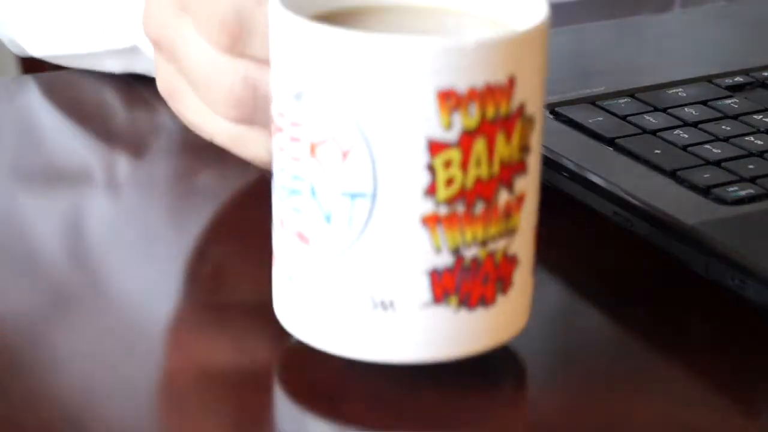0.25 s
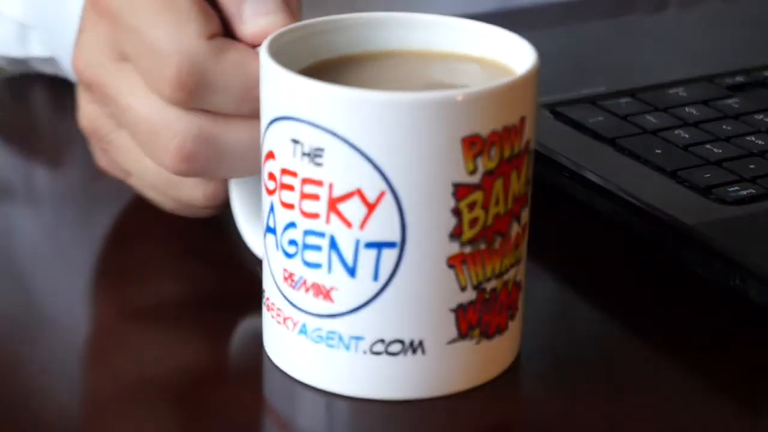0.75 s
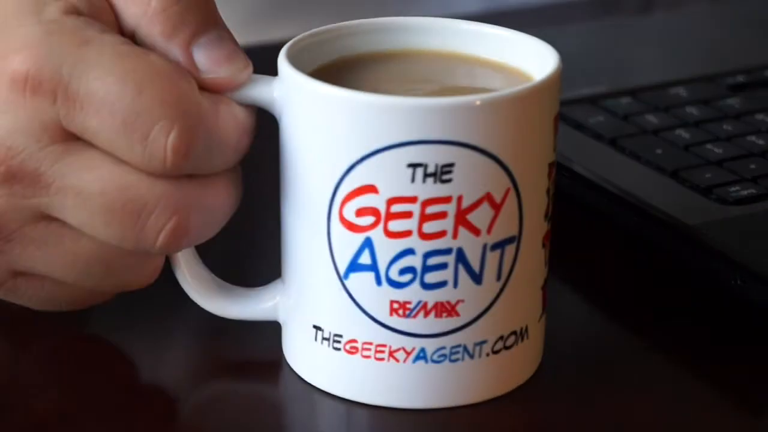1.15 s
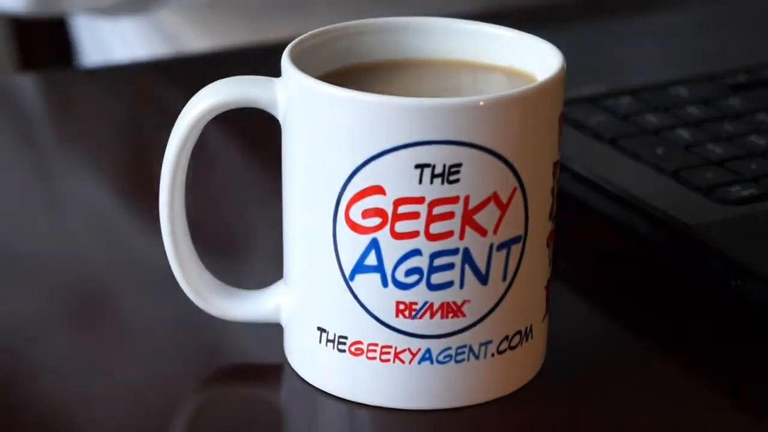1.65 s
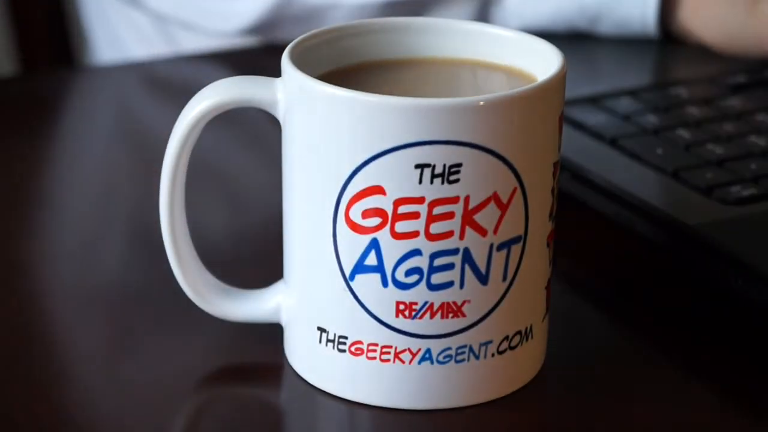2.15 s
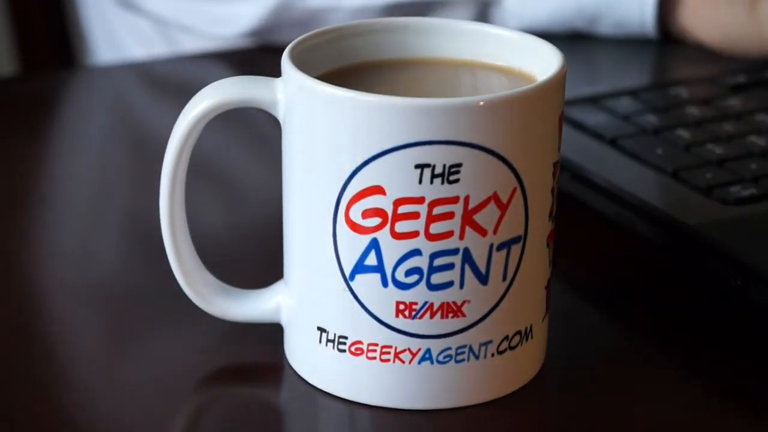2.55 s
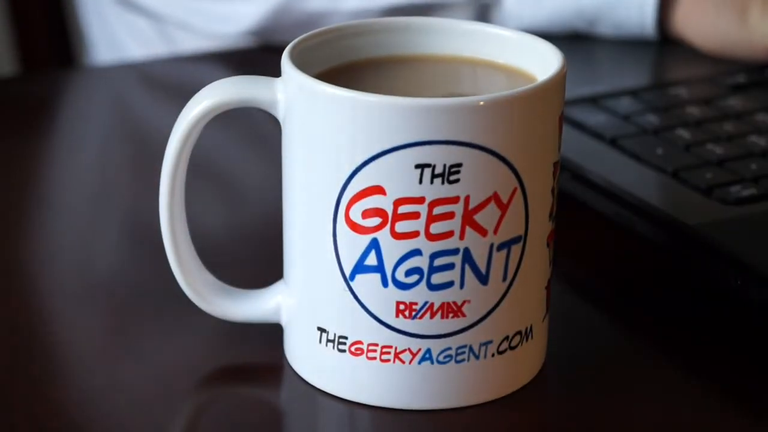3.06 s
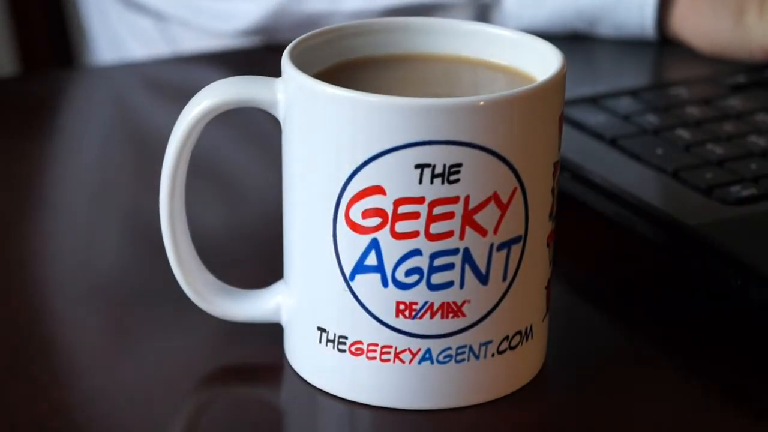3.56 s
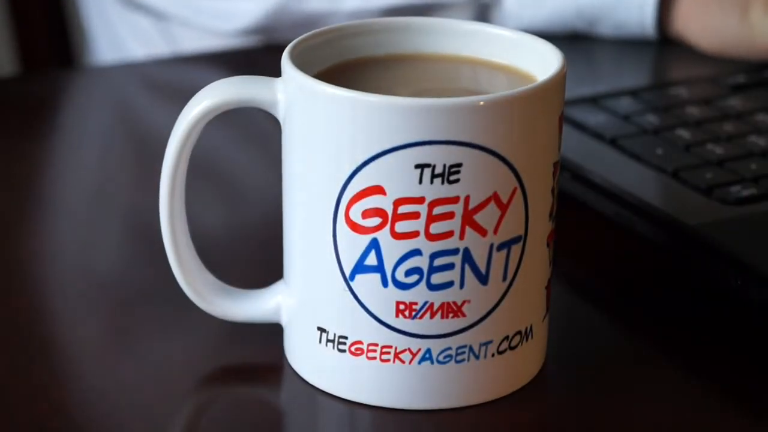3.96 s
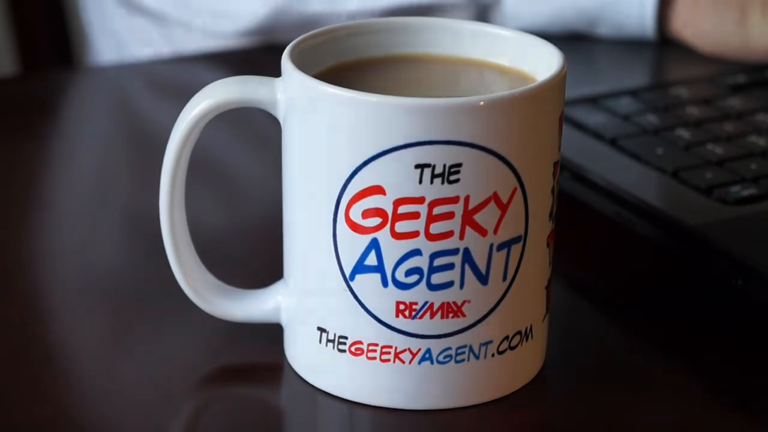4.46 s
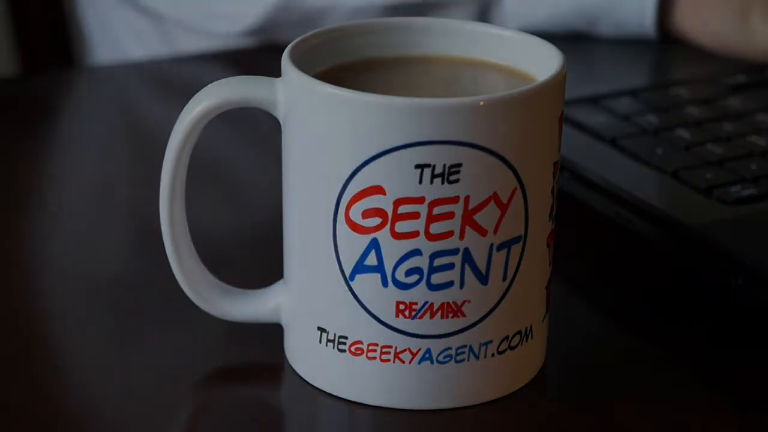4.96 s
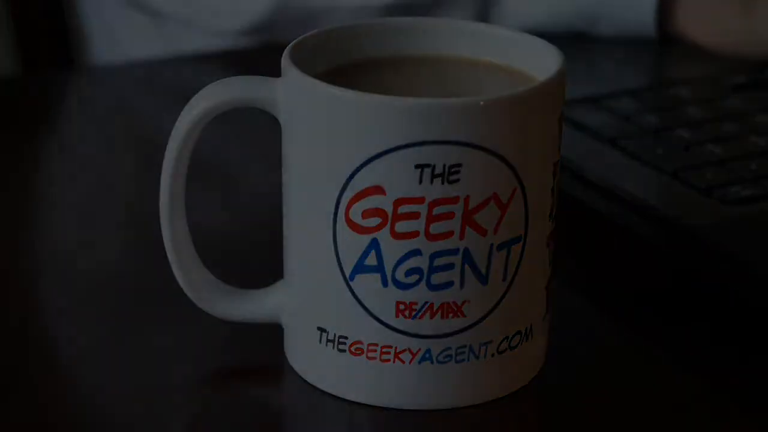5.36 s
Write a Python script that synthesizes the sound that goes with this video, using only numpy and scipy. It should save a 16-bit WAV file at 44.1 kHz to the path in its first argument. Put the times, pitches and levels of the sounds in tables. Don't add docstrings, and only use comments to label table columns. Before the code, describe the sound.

A quiet, bare office: low fan rush and a faint, very high electronic whine throughout. Tiny handle ticks come at about 0.15 s. At 0.41 s a heavy full mug strikes a wooden desk, two contacts only milliseconds apart, heard as one hard, loud, woody knock; the desk rings briefly, the room answers and the camera's automatic level ducks, then recovers. From about 0.7 to 1.5 s the mug's foot rubs round in a low, gritty stick-slip drag with a thin scrape, dotted by bright ceramic ticks, the sharpest near 1.33 s. A fainter rub, a tiny creak and a soft sleeve rustle fill 1.5 to 2.2 s. Laptop typing starts sparsely around 2.2 s and becomes quick and uneven from 2.9 to 5.4 s: crisp ticks, loose keycap rattle, occasional metallic jingle of wide keys, and soft dull thuds through the desk. It stays close, dry and much quieter than the knock.

```python
import sys
import numpy as np
from scipy import signal
from scipy.fft import rfft, irfft, next_fast_len
from scipy.io import wavfile
from scipy.ndimage import uniform_filter1d, minimum_filter1d

SR = 44100
rng = np.random.default_rng(int(sys.argv[2]) if len(sys.argv) > 2 else 0)


def materialize(psi):
    bounded = np.clip(np.atleast_2d(psi).T, -1, 1)
    quanta = np.round(bounded * 32767).astype(np.int16)
    wavfile.write(sys.argv[1], SR, quanta)


def undo_db(level):
    steps = np.asarray(level, float) / 20
    return 10 ** steps


N = 247401

# start in seconds, level in dB.
MUG_CONTACTS = [
    (.4086, 2.5),
    (.4128, 3.5),
]
# frequency in Hz, level in dB, t60 in seconds.
DESK_MODES = [(62, -21, 0.75), (125.8, -8.5, 0.64), (228, -0.5, 0.39), (330.8, 7.5, 0.29),
              (545, 10.5, 0.24), (778.3, 4.5, 0.32), (484.5, 11.5, 0.16), (703, -1.5, 0.47),
              (1204, 6.5, 0.094), (1606, -6.5, 0.46)]
# frequency in Hz, density in dB per Hz.
BLOW_COLOUR = [(25, -93), (60, -25), (120, -9.5), (350, -3), (700, -2.5), (1500, -4), (2500, -16.5),
               (3600, -22.5), (4600, -28), (8000, -33), (11000, -54), (15000, -88)]
# time in seconds, effort in dB.
DRAG_EFFORT = [(.68, -35.5), (.8, -44.5), (.9, -33.5), (1.02, -34), (1.15, -38), (1.3, -37), (1.44, -40),
               (1.55, -61), (1.66, -57)]
# frequency in Hz, density in dB per Hz.
RUB_COLOUR = [(47, -57), (80, -31), (190, -17), (354, -2.5), (437, -15.5), (549, -5.5), (679, -15.5),
              (948, -12), (3000, -28.5), (3900, -69), (6600, -120)]
# frequency in Hz, density in dB per Hz.
SCRAPE_COLOUR = [(1500, -28), (2800, 6), (5000, 11), (8000, 10), (11000, -37), (15000, -35)]
# frequency in Hz, width in Hz, level in dB.
SHELL_MODES = [(480, 97, 29), (858, 29, 33), (1014, 90, 28), (2120, 220, 4), (2630, 33, -20)]
# frequency in Hz, width in Hz, level in dB.
THUD_MODES = [(64, 15, -8.5), (112.2, 15.3, 1.5), (139, 33, -3.5), (241.6, 5.6, -7)]
# frequency in Hz, density in dB per Hz.
KEYCAP_COLOUR = [(880, -32), (1500, 1), (2120, -4), (2940, -3.5), (3280, -6.5), (3620, -5.5), (4920, -8),
                 (7610, -4), (10100, -8.5), (16000, -27.5)]
# frequency in Hz, density in dB per Hz.
AIR_COLOUR = [(12, -35), (20, -0.5), (74, -6), (193, -3.5), (357, -5), (434, -9), (800, -16.5), (1370, -20),
              (2200, -25.5), (4500, -28), (7700, -27), (11800, -33.5), (14000, -27.5), (15800, -43)]
# frequency in Hz, width in Hz, rms level in dB.
WHINE_BANDS = [(7870, 60, -72), (12500, 150, -73), (13200, 170, -62.5)]
# frequency in Hz, t60 in seconds.
ROOM_T60 = [(100, 0.48), (500, 0.57), (2000, 0.62), (5000, 0.48), (9000, 0.39), (14000, 0.36)]
# frequency in Hz, side minus mid in dB.
SIDE_LEVEL = [(60, -26), (110, -21), (200, -16.5), (380, -12.5), (700, -6.5), (1290, -6.5), (2380, -6.5),
              (4400, -13), (8120, -15), (15000, -19.5)]
# start in seconds, desk thud in dB, shell knock in dB re thud, knock pitch in Hz.
STROKES = [(1, -39.5, -1, 264), (1.329, -37, -2, 315), (1.429, -40, -4, 307), (1.729, -52, 6.5, 834),
           (2.352, -42, 8, 268), (2.371, -49, 5.5, 447), (2.449, -33, -2.5, 390), (2.665, -54, 1, 308),
           (2.896, -41, 0, 260), (2.958, -31, -5.5, 914), (3.066, -30.5, -16, 318),
           (3.122, -29, -16.5, 580), (3.219, -30.5, -15, 585), (3.319, -35, -7.5, 495),
           (3.467, -38, -1, 273), (3.679, -33, -4, 282), (3.705, -46.5, 1.5, 847),
           (3.909, -31.5, -0.5, 636), (4.023, -42.5, 1.5, 1125), (4.049, -43, 9, 267),
           (4.201, -31, -4, 300), (4.215, -41.5, 2.5, 445), (4.369, -32.5, -10, 514), (4.588, -30, -8, 547),
           (4.703, -32, -2, 497), (4.798, -28, -11, 570), (4.889, -33.5, -6.5, 486), (4.965, -33, -9, 290),
           (5.259, -30.5, -20, 397), (5.349, -36, -2, 302)]
# start in seconds, peak in dB, pitch in Hz.
SNAPS = [(0.1395, -31, 7500), (0.151, -29, 7800), (0.8914, -24.5, 5620), (0.9961, -16, 5700),
         (1.0061, -12, 8400), (1.1042, -21, 6800), (1.3256, -2.5, 7650), (1.335, -11.5, 6660),
         (1.3378, -15, 8300), (2.1886, -24, 5800), (2.2578, -13, 5870), (2.3674, -12, 7650),
         (2.372, -12, 8140), (2.6764, -11, 7350), (3.125, -21, 8700), (3.349, -20, 7600),
         (3.6904, -15, 9000), (3.8981, -20, 8100), (4.021, -20, 8500), (4.0273, -17, 7140),
         (4.205, -20, 6000), (4.3755, -33, 8150), (4.7135, -15, 8050), (4.7945, -15, 7800),
         (4.8047, -15, 8000)]
# start in seconds, level in dB, pitch in Hz, length in seconds.
SQUEAKS = [
    (1.603, -56, 6280, 0.028),
    (1.704, -50, 825, 0.042),
]
# start in seconds, level in dB, dull clack in dB, pitch in Hz.
HANDLE_TAPS = [(0.1393, -30, -9.5, 7360), (0.15, -32, -23, 8000), (0.497, -12.5, -3, 7600),
               (0.836, -28.5, -3.5, 6200), (0.8914, -37.5, 3.5, 5620), (0.9144, -17.5, -13, 4680),
               (0.95, -33, -12, 4770), (0.9951, -19, -4, 5930), (1.005, -17, -18.5, 8000),
               (1.105, -12.5, -11.5, 7160), (1.2182, -22.5, -6.5, 7600), (1.325, -15, -26, 7850),
               (1.729, -34.5, -22, 4260)]
# touch in seconds, touch in dB, bottoming in dB, cap pitch in Hz.
PRESSES = [(2.167, -31, -32, 5360), (2.3636, -21.5, -23.5, 8000), (2.6604, -27, -17, 6650),
           (2.9487, -31, -23.5, 6430), (3.1168, -23, -36, 6300), (3.214, -29, -30, 7000),
           (3.3382, -27, -20, 7960), (3.671, -20, -37, 8250), (3.8984, -20, -24.5, 7860),
           (4.02, -24.5, -25.5, 8800), (4.1951, -20.5, -18.5, 7670), (4.356, -30, -23, 7700),
           (4.5747, -30, -33.5, 8200), (4.703, -20.5, -17.5, 7800), (4.794, -17.5, -36, 6900),
           (4.8849, -28, -26.5, 7800)]
# start in seconds, level in dB, deck clack in dB, cap pitch in Hz.
LIGHT_TAPS = [(2.1867, -26, -11, 5870), (2.21, -22.5, -12.5, 3980), (2.2500, -25.5, -28, 5800),
              (2.2589, -20, -14, 6070), (2.4474, -37.5, -3, 7240), (2.731, -22.5, -12.5, 5370),
              (2.9110, -24.5, -9.5, 7000), (3.053, -27.5, -21, 8000), (3.27, -32, -7, 7000),
              (3.299, -25, -12, 4200), (3.3662, -37, -32, 8600), (3.69, -22.5, -22, 8600),
              (3.9134, -30.5, -21, 7900), (4.3776, -28, -27, 7700), (4.9665, -29.5, -37, 7140),
              (5.1794, -30.5, -12.5, 7600), (5.2537, -32.5, -28, 8100), (5.3317, -25.5, -18.5, 7900),
              (5.36, -30.5, -11.5, 8100), (5.4662, -31, -14, 8100)]
# start in seconds, length in seconds, level in dB, pitch in Hz.
RUSTLES = [
    (0.902, 0.063, -40.5, 4950),
    (1.695, 0.58, -60, 7540),
    (2.164, 0.072, -49.5, 4440),
]
# start in seconds, level in dB.
WIRES = [(2.368, -24), (3.345, -19), (3.674, -23), (4.198, -24.5), (5.337, -26)]

AIR_DB, TOP_HZ = -46.5, 15750
TRAVEL_S, TOUCH_CLACK_DB, BOTTOM_CLACK_DB = 0.0082, -37.5, -27
KEY_RISE_S, KEY_T60_S, RING_RISE_S, RING_T60_S = 0.0053, 0.041, 0.004, 0.025
WIRE_HZ, WIRE_CLACK_DB = 13600, -35
SCRAPE_DB, SCRAPE_PER_EFFORT = -46, 0.74
SCRAPE_END_S, SCRAPE_FADE_DB_PER_S = 1.3, 200
JUDDER_DB = 2
THUD_LEAD_S = 0.00613
HUSH_JUMP_DB, HUSH_LOW_HZ, HUSH_HIGH_HZ = 36, 800, 12400


def unit(x):
    return x / np.sqrt(np.mean(x ** 2) + 1e-20)


def along(points, hz):
    f, v = np.transpose(points)
    return np.interp(np.log(hz + 1), np.log(f + 1), v)


def filtered(x, response):
    n = x.shape[-1]
    m = next_fast_len(n + SR // 2)
    return irfft(rfft(x, m) * response(np.fft.rfftfreq(m, 1 / SR)), m)[..., :n]


def causal(x, colour):
    colour_db = np.maximum(along(colour, np.fft.rfftfreq(4096, 1 / SR)), -90)
    cepstrum = irfft(np.log(undo_db(colour_db)))
    cepstrum[1:2048] *= 2
    cepstrum[2049:] = 0
    h = irfft(np.exp(rfft(cepstrum)))
    return signal.fftconvolve(x, h / np.linalg.norm(h))[:len(x)]


def body(modes):
    def response(f):
        return sum((-1) ** k * undo_db(db) * 1j * f * w / (c * c - f * f + 1j * f * w)
                   for k, (c, w, db) in enumerate(modes))
    return response


def stereo(pair, extra_db):
    side = filtered(pair[1], lambda hz: undo_db(along(SIDE_LEVEL, hz) + extra_db))
    return np.array([pair[0] + side, pair[0] - side])


def grit(rate_hz, spread_db):
    hits = rng.random(N) < rate_hz / SR
    return unit(hits * rng.standard_normal(N) * undo_db(spread_db * rng.exponential(size=N)))


def mug():
    t = np.arange(SR) / SR
    pushes, ring = np.zeros((len(MUG_CONTACTS), N + SR)), np.zeros(N + SR)
    for row, (s, db) in zip(pushes, MUG_CONTACTS):
        chatter = undo_db(-28.5 - 60 * t / 0.11) * rng.standard_normal(SR)
        push = causal(chatter - 3 * signal.unit_impulse(SR), BLOW_COLOUR)
        row[round(s * SR):][:SR] = undo_db(db + 5.5) * push
    modes = sum(undo_db(db - 60 * t / t60) * np.sin(2 * np.pi * hz * t) for hz, db, t60 in DESK_MODES)
    beat = 1 - 0.31 * np.sin(2 * np.pi * 7.1 * t)
    rise = 1 - np.exp(-t / 0.014)
    ring[round(MUG_CONTACTS[0][0] * SR):][:SR] = undo_db(-5.0) * rise * beat * modes
    return pushes[:, :N], ring[:N]


def drag():
    t = np.arange(N) / SR
    effort_db = np.interp(t, *np.transpose(DRAG_EFFORT), -120, -120)
    fade_db = SCRAPE_FADE_DB_PER_S * np.maximum(t - SCRAPE_END_S, 0)
    scrape_db = SCRAPE_DB + SCRAPE_PER_EFFORT * (effort_db - effort_db.max() + 9) - fade_db
    grains = grit(1500, spread_db=0.5) + 0.65 * rng.standard_normal(N)
    rumble = unit(causal(grains, RUB_COLOUR))
    scrape = unit(causal(grit(5000, spread_db=3.0), SCRAPE_COLOUR))
    wander = uniform_filter1d(uniform_filter1d(rng.standard_normal(N), size=1500), size=1500)
    judder_db = JUDDER_DB * unit(wander)
    return undo_db(effort_db + judder_db - 3.5) * rumble + undo_db(scrape_db - 10.5) * scrape


def contacts():
    key, ring = (KEY_RISE_S, KEY_T60_S), (RING_RISE_S, RING_T60_S)
    handle = [tuple(row) + ring for row in HANDLE_TAPS]
    light = [tuple(row) + key for row in LIGHT_TAPS]
    touches = [(s, db, TOUCH_CLACK_DB, hz) + key for s, db, _, hz in PRESSES]
    bottoms = [(s + TRAVEL_S, db, BOTTOM_CLACK_DB, hz) + key for s, _, db, hz in PRESSES]
    wires = [(s, db, WIRE_CLACK_DB, WIRE_HZ) + key for s, db in WIRES]
    return handle + light + touches + bottoms + wires


def keys():
    t = np.arange(3072) / SR
    caps, hits = np.zeros((2, N + SR)), contacts()
    noises = rng.standard_normal((len(hits), 3, len(t)))
    for (s, db, clack_db, hz, rise_s, t60_s), noise in zip(hits, noises):
        swell = (1 - np.exp(-t / rise_s)) * undo_db(db - 1.5 - 60 * t / t60_s)
        lumps = undo_db(4.1 * unit(uniform_filter1d(noise[2], size=40)) - 1.0)
        cap = body([(hz, 0.5 * hz, 0)])
        deck = body([(2810, 3600, clack_db + 10)])
        rattle = filtered(swell * lumps * noise[:2], lambda f: 0.25 + cap(f) - deck(f))
        caps[:, round(s * SR):][:, :len(t)] += rattle
    return np.array([causal(row, KEYCAP_COLOUR)[:N] for row in caps])


def snaps():
    out, t = np.zeros(N + SR), np.arange(256) / SR
    for (s, db, hz), turn in zip(SNAPS, rng.random((len(SNAPS), 2))):
        tones = np.sin(2 * np.pi * hz * t)
        tones += 0.15 * np.sin(2 * np.pi * (1.44 * hz * t + turn[0]))
        tones += 0.3 * np.sin(2 * np.pi * (0.573 * hz * t + turn[1]))
        tones += 0.074 * np.sin(2 * np.pi * 1.58 * hz * t)
        envelope = undo_db(db - 2.0 - 60 * t / 0.0029) * (1 - np.exp(-t / 0.00009))
        out[round((s + 0.0006) * SR):][:len(t)] += envelope * tones
    return out[:N]


def strokes():
    knocks, thuds = np.zeros((2, N + SR))
    t = np.arange(4096) / SR
    for (s, db, knock_db, hz), noise in zip(STROKES, rng.standard_normal((len(STROKES), len(t)))):
        level_db = db + knock_db
        puff = (1 - np.exp(-t / 0.0068)) * undo_db(level_db + 21 - 60 * t / 0.026) * noise
        ring = 0.32 * (1 - np.exp(-t / 0.0021)) * undo_db(level_db + 12.5 - 60 * t / 0.052)
        ring = ring * np.sin(2 * np.pi * hz * t)
        spot, shell = body([(hz, 0.45 * hz, 4)]), body(SHELL_MODES)
        share = 0.12 * min(hz / 800, 1)
        knocks[round(s * SR):][:len(t)] += ring + filtered(puff, lambda f: spot(f) + share * shell(f))
        thuds[round((s - THUD_LEAD_S) * SR):][:132] += undo_db(db + 9) * np.hanning(132)
    return knocks[:N] + undo_db(4.5) * filtered(thuds, body(THUD_MODES))[:N]


def squeaks():
    t, out = np.arange(N) / SR, np.zeros(N)
    for s, db, hz, length_s in SQUEAKS:
        swell = np.sin(np.pi * np.clip((t - s) / length_s, 0, 1)) ** 2
        out += undo_db(db) * swell * np.sin(2 * np.pi * hz * t)
    return out


def sleeve():
    t, out = np.arange(N) / SR, np.zeros(N)
    for s, length_s, db, hz in RUSTLES:
        swell = np.sin(np.pi * np.clip((t - s) / length_s, 0, 1))
        cloth = body([(hz, 0.6 * hz, 0)])
        out += undo_db(db) * swell * unit(filtered(grit(6000, spread_db=-8.0), lambda f: cloth(f) ** 2))
    return out


def room(x, wet_db, extra_db):
    out, step, size = np.zeros((2, N + 2 * SR)), SR // 3, 3 * SR // 4
    for at in range(0, N, step):
        hz, t, z = signal.stft(rng.standard_normal((2, size)), SR, nperseg=256)
        decay = undo_db(-60 * t / along(ROOM_T60, hz)[:, None])
        tail = signal.istft(z * decay, SR, nperseg=256)[1]
        tail *= 1 - np.exp(-np.arange(tail.shape[1]) / (0.0045 * SR))
        wet = signal.fftconvolve(x[None, at:at + step], tail / np.linalg.norm(tail[0]), axes=1)
        out[:, at:at + wet.shape[1]] += wet
    return undo_db(wet_db) * stereo(out[:, :N], extra_db)


def air():
    z = signal.stft(rng.standard_normal((2, N)), nperseg=1024)[2]
    patches = uniform_filter1d(rng.standard_normal(z.shape[1:]), size=6, axis=0)
    patches = uniform_filter1d(patches, size=8, axis=1)
    pair = signal.istft(z * undo_db(0.62 * unit(patches)), nperseg=1024)[1][:, :N]
    rush = filtered(pair, lambda hz: undo_db(along(AIR_COLOUR, hz)))
    whine = np.zeros(N)
    for c, w, db in WHINE_BANDS:
        band = filtered(rng.standard_normal(N), lambda f: np.exp(-((f - c) / w) ** 2))
        whine += undo_db(db) * unit(band)
    return stereo(undo_db(AIR_DB) * rush / np.std(rush[0]), extra_db=7) + whine


def scene():
    (pushes, ring), slide, typing, clicks, fingers = mug(), drag(), keys(), snaps(), strokes()
    tones = squeaks()
    small = undo_db(-4.5) * slide + typing[0] + undo_db(-13) * clicks + undo_db(-0.5) * fingers + tones
    walls = sum(room(push, wet_db=10.5, extra_db=-8.0) for push in pushes)
    walls = walls + room(small, wet_db=1.0, extra_db=-2.5)
    direct = pushes.sum(axis=0) + ring + slide + stereo(typing, extra_db=-3.0) + clicks + fingers + tones
    return direct + sleeve() + walls + air()


def hush(x):
    now_db = 10 * np.log10(np.abs(uniform_filter1d(np.mean(x ** 2, axis=0), size=128)) + 1e-12)
    ahead_db = -minimum_filter1d(-now_db, size=700, origin=-350)
    share = uniform_filter1d(1.0 * (ahead_db - now_db > HUSH_JUMP_DB), size=48)

    def edge(hz, kind):
        return signal.sosfilt(signal.butter(6, hz, kind, fs=SR, output="sos"), x)
    return (1 - share) * x + share * (edge(HUSH_LOW_HZ, "low") + edge(HUSH_HIGH_HZ, "high"))


def roll_off(x):
    return signal.sosfilt(signal.butter(12, 16680, fs=SR, output="sos"), x)


def record(dry):
    keep = np.exp(-1 / (0.048 * SR))
    power = signal.lfilter([1 - keep], [1, -keep], np.mean(dry ** 2, axis=0))
    level_db = 10 * np.log10(power + 1e-12)
    creep_db = 21 * np.arange(N) / SR
    duck_db = np.maximum.accumulate(0.63 * np.maximum(level_db + 21.5, 0) + creep_db) - creep_db
    gain = undo_db(-uniform_filter1d(duck_db, size=400, origin=-100))
    x = hush(dry) * gain
    x = x / (1 + np.abs(x) ** 6) ** (1 / 6)
    x = filtered(x, lambda hz: hz < TOP_HZ)
    return roll_off(x)


dry = scene()
out = record(dry)
materialize(out)
```